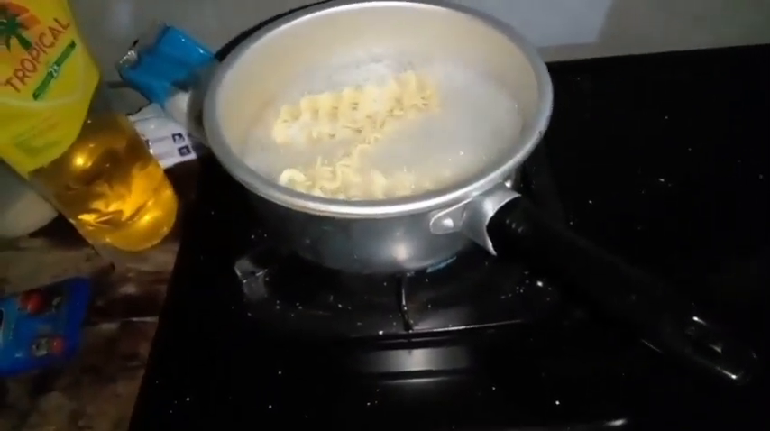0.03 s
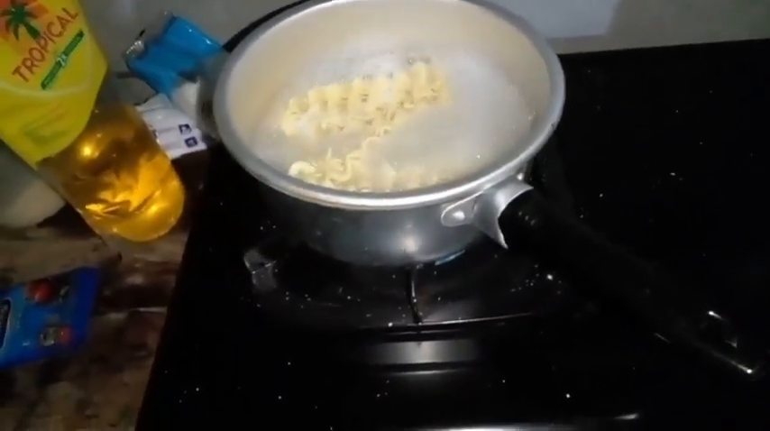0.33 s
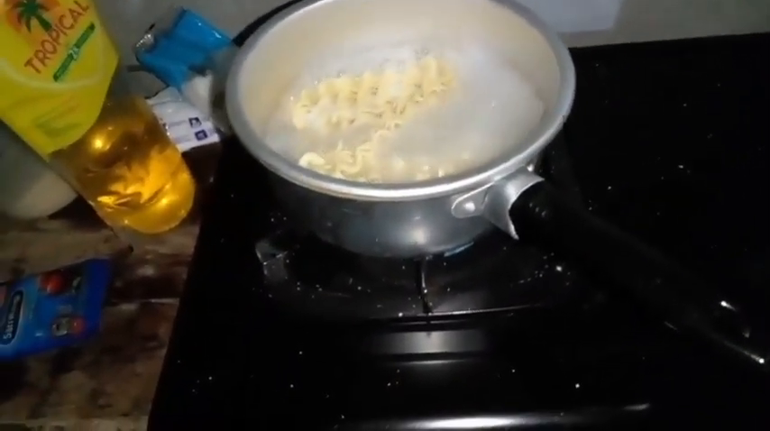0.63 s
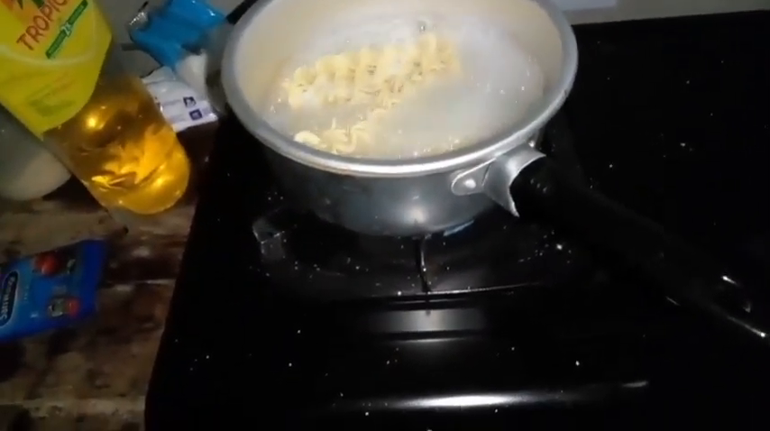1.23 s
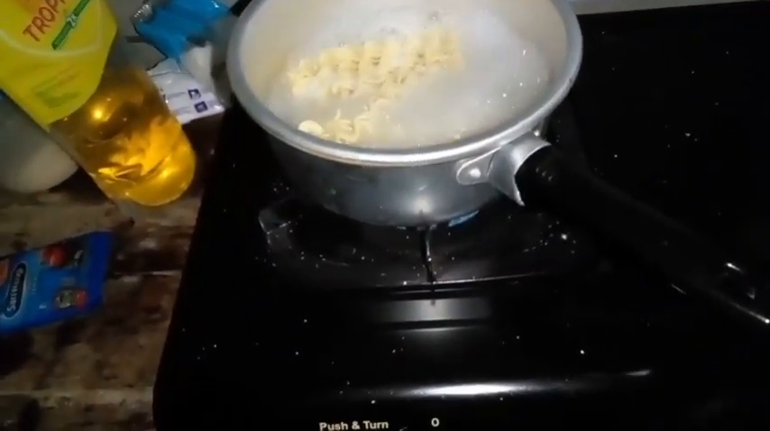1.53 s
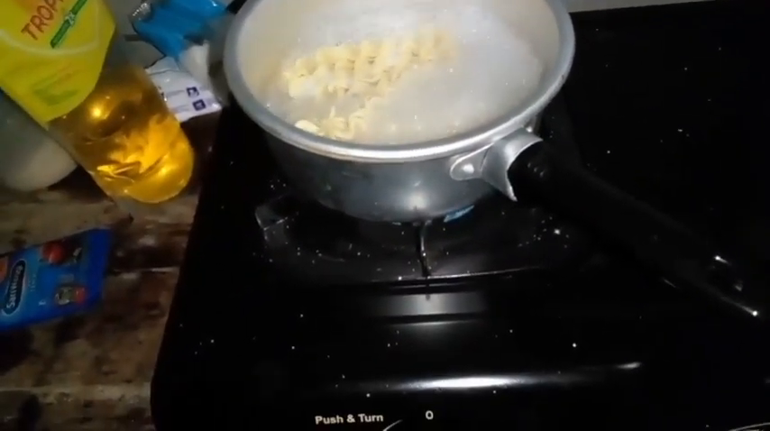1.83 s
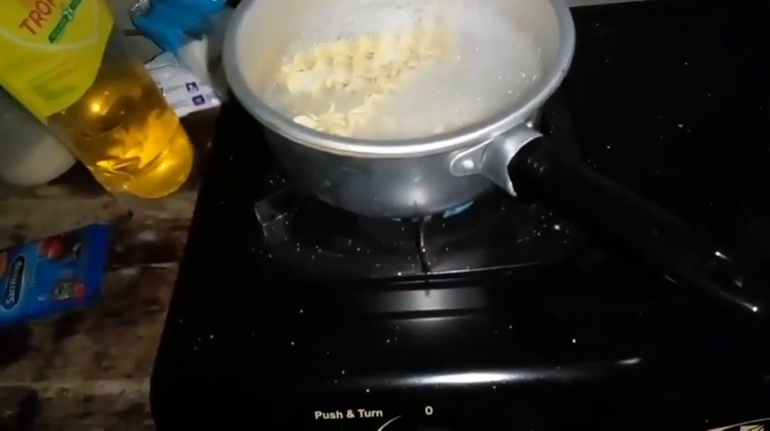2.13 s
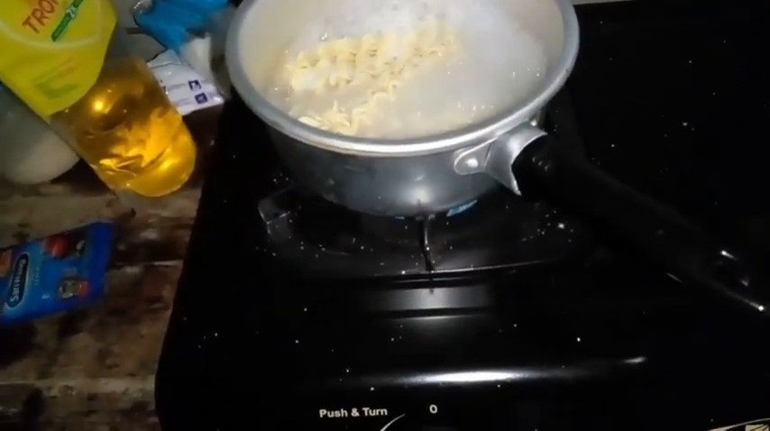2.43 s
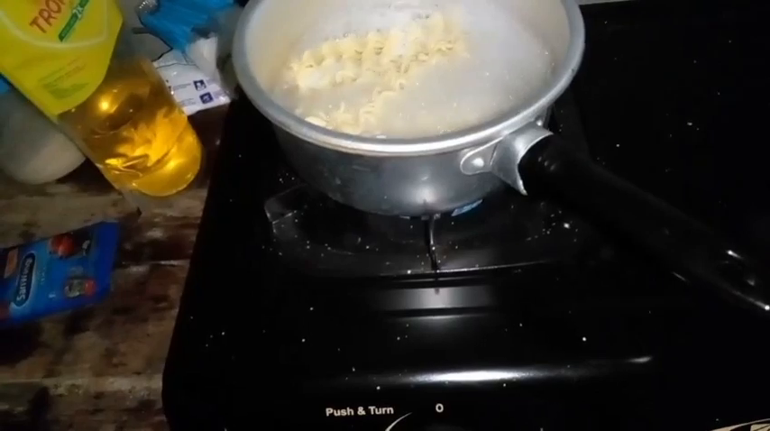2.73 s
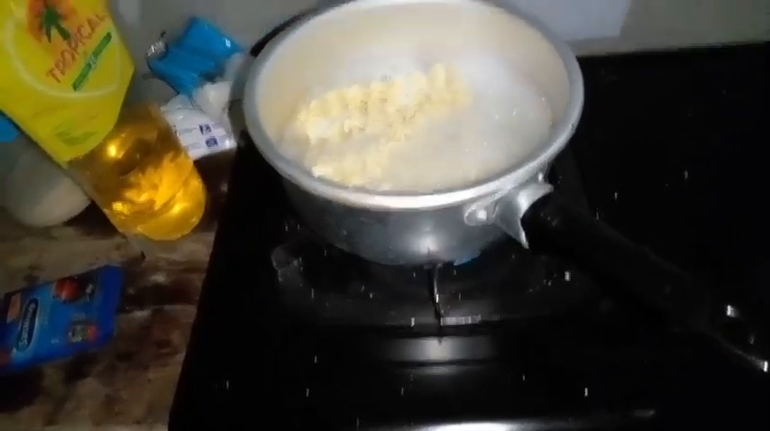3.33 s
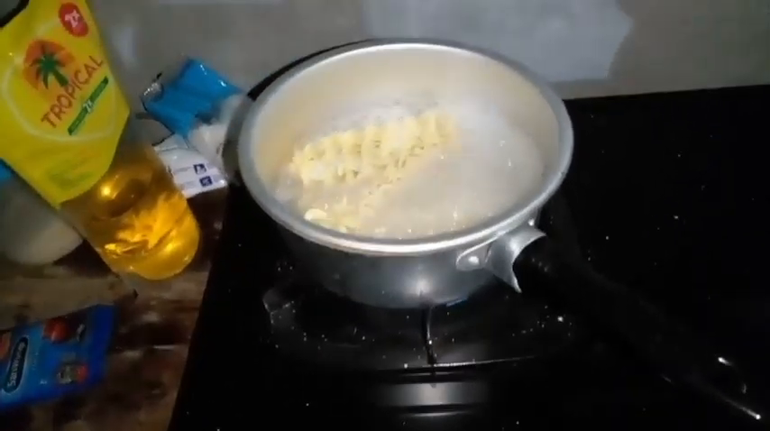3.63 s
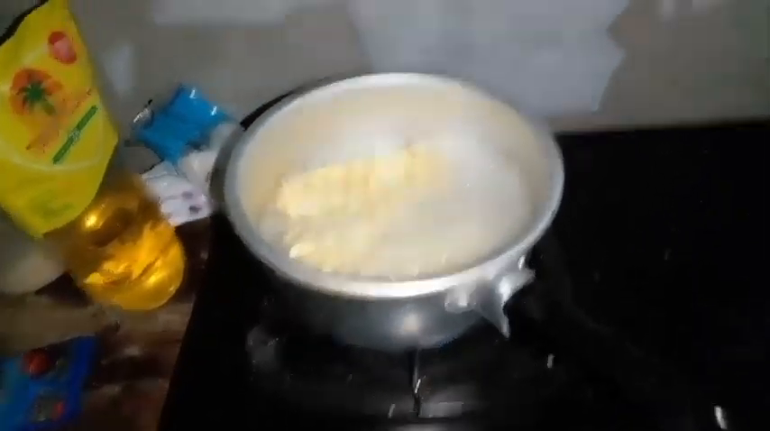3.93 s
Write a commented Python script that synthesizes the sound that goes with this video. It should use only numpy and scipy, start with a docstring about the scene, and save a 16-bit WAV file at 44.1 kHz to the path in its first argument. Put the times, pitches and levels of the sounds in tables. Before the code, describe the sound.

A plastic packet crinkles close by, with a first squeeze in the opening 0.3 seconds, then only sparse ticks until about 1.2. From there it crackles almost continuously to 4 seconds, with sharper snaps near 1.7, 2.0, 2.7, 3.2 and 3.7. A pot fizzes faintly over a softly rushing gas burner throughout, and faint low hums swell and fade until about 2.3. The small kitchen adds a short echo.

```python
"""A small kitchen: a plastic noodle packet is squeezed and crinkled beside a pot simmering on a stove.
The burner rushes under the fizzing pot, and a few low hums swell and fade.
Each squeeze buckles the film in a swarm of tiny creases; single folds snap out above them,
ringing the film and the packet's hollow, and the room answers. Mono."""
import sys
import numpy as np
from scipy import signal
from scipy.fft import rfft, irfft, next_fast_len
from scipy.io import wavfile
from scipy.ndimage import map_coordinates

SR = 44100
rng = np.random.default_rng(int(sys.argv[2]) if len(sys.argv) > 2 else 0)


def persist_wave(psi):
    """Save psi, clipped to +-1, as 16-bit WAV."""
    counts = np.round(np.clip(psi, -1, 1) * 32767).astype(np.int16)
    wavfile.write(sys.argv[1], SR, np.atleast_2d(counts).T)


N = 4 * SR
TIME_S = np.arange(N) / SR


def amp(db):
    """Decibels to gain."""
    return 10 ** (np.asarray(db) / 20)


def unit_rms(x):
    """Scale to rms 1."""
    return x / np.sqrt(np.mean(x ** 2) + 1e-20)


def over_frequency(points, hz):
    """Interpolate (frequency [Hz], value) points on a log axis."""
    knots_hz, values = np.transpose(points)
    return np.interp(np.log(hz + 1), np.log(knots_hz + 1), values)


def over_time(rows):
    """One value per sample for each column after the time."""
    knots_s, *columns = np.transpose(rows)
    return [np.interp(TIME_S, knots_s, column) for column in columns]


def wobble(rate_hz):
    """Smooth random curve, rate_hz knots a second."""
    knots = rng.standard_normal(int(N * rate_hz / SR) + 4)
    return map_coordinates(knots, [TIME_S * rate_hz])


def colour(x, spectrum):
    """Minimum-phase filter through (frequency [Hz], gain [dB]) points."""
    size = 2 * next_fast_len(len(x))
    gain = amp(over_frequency(spectrum, np.fft.rfftfreq(size, 1 / SR)))
    cepstrum = irfft(np.log(gain), size)
    cepstrum[1:size // 2] *= 2
    cepstrum[size // 2 + 1:] = 0
    return irfft(rfft(x, size) * np.exp(rfft(cepstrum)), size)[:len(x)]


def resonate(x, hz, q):
    """One resonance."""
    return signal.lfilter(*signal.iirpeak(hz, q, SR), x)


def swarm(rate_hz, spread_db, decay_s, count=16000):
    """Envelope of rms 1: tiny bursts of random time and size."""
    starts = (np.cumsum(rng.exponential(size=count)) * SR / rate_hz).astype(int)
    sizes = amp(spread_db * np.minimum(rng.standard_normal(count), 2))
    impulses = np.bincount(starts[starts < N], sizes[starts < N] ** 2, N)
    power = signal.lfilter([1], [1, -np.exp(-2 / (decay_s * SR))], impulses)
    return unit_rms(np.sqrt(power))


# flame spectrum (frequency [Hz], relative gain [dB])
BURNER_SPECTRUM = [(20, -46), (37, -10), (75, -2), (145, 2.5), (185, -5.5), (240, 2), (330, 0.5), (420, -8),
                   (520, -14.5), (800, -13.5), (1100, -21.5), (2000, -13.5), (6000, -42)]
# pot spectrum (frequency [Hz], relative gain [dB])
POT_SPECTRUM = [(500, -38), (1100, -9.5), (1350, -2), (1540, 9), (1700, -1.5), (2200, -6), (3000, -7.5),
                (4500, -11.5), (6800, -8.5), (7700, -19), (12500, -13), (16000, -17.5)]
# stove levels (time [s], burner [dB], simmer [dB])
STOVE_LEVELS = [(0, -47, -45), (.9, -48.5, -51), (1.08, -46.5, -46), (2, -46, -46.5), (2.6, -47, -47),
                (4, -46.5, -44.5)]


def stove():
    """The burner rushes; tiny bubbles fizz and ring the pot."""
    burner_db, simmer_db = over_time(STOVE_LEVELS)
    flame = unit_rms(colour(rng.standard_normal(N), BURNER_SPECTRUM))
    bubbles = swarm(rate_hz=1600, spread_db=3.5, decay_s=0.0023) * rng.standard_normal(N)
    pot = unit_rms(colour(bubbles, POT_SPECTRUM))
    return amp(burner_db) * flame + amp(simmer_db) * pot


# low hums (peak time [s], pitch [Hz], peak rms level [dB], 1/e half-width [s])
HUM_SWELLS = [(0.205, 77.1, -48.5, 0.18), (0.473, 76.2, -44.5, 0.07), (0.21, 211, -52, 0.12),
              (0.66, 209.2, -49, 0.2), (0.74, 96, -44, 0.14), (0.735, 137, -47, 0.24),
              (1.267, 139, -48, 0.17), (1.526, 79.3, -49.5, 0.16), (1.708, 73, -42.5, 0.059),
              (1.72, 210.4, -47, 0.076), (2.247, 134, -50.5, 0.075)]


def hums():
    """Low, slightly unsteady tones swell and fade."""
    out = np.zeros(N)
    for peak_s, hz, db, half_width_s in HUM_SWELLS:
        swell = amp(db) * np.exp(-((TIME_S - peak_s) / half_width_s) ** 2)
        drift_rad = 0.77 * wobble(rate_hz=12.8)
        out += swell * np.sqrt(2) * np.sin(2 * np.pi * hz * TIME_S + drift_rad)
    return out


# room decay (frequency [Hz], T60 [s])
KITCHEN_T60 = [(200, 0.84), (2000, 0.22), (6500, 0.23), (15000, 0.34)]


def kitchen(x, positions=14, wall_delay_s=0.0088):
    """Room reverberation, crossfaded from tail to tail as the packet moves."""
    out = np.zeros(N)
    position = np.linspace(0, positions - 1, N)
    for k in range(positions):
        hz, t, noise = signal.stft(rng.standard_normal(SR // 2), SR, nperseg=256)
        decay = amp(-60 * t / over_frequency(KITCHEN_T60, hz)[:, None])
        _, tail = signal.istft(noise * decay, SR, nperseg=256)
        tail *= 1 - np.exp(-(np.arange(len(tail)) / SR / wall_delay_s) ** 2)
        crossfade = np.maximum(1 - abs(position - k), 0)
        out += signal.fftconvolve(x * crossfade, tail / np.linalg.norm(tail))[:N]
    return out


# film spectrum (frequency [Hz], relative gain [dB])
FILM_SPECTRUM = [(300, -23.5), (800, -6), (1100, -11.5), (1700, -3.5), (2200, 1), (2850, -3), (3300, -3),
                 (4100, -4), (5300, -5), (6900, -1), (7700, -18.5), (9000, -25)]
# film's top treble (frequency [Hz], relative gain [dB])
CRACK_SPECTRUM = [(1000, -39), (5000, -22), (7500, -3), (9000, -1), (12000, 4), (14000, 2.5), (16000, 0)]
# steady handling between squeezes (time [s], relative level [dB])
HANDLING_LEVELS = [(0, -54.5), (.3, -47), (.45, -56), (.9, -68), (1.02, -56), (1.2, -46.5), (1.55, -45.5),
                   (1.85, -42), (2.16, -47.5), (2.33, -42), (2.4, -59.5), (2.63, -50), (2.71, -46),
                   (2.95, -46.5), (3.17, -47.5), (3.5, -43), (3.82, -42), (4, -45)]
# squeezes (peak time [s], relative level [dB], rise [s], fall [s], treble boost [dB], hollow pitch [Hz])
PACKET_SQUEEZES = [(.135, -41.5, 0.033, 0.15, 0, 2050), (.2, -36.5, 0.064, 0.054, 3, 2200),
                   (0.948, -36.5, 0.011, 0.012, 0.5, 1780), (1.31, -41.5, 0.17, .025, -1, 2530),
                   (1.615, -34, 0.041, 0.071, 1.5, 2450), (1.705, -29.5, 0.022, 0.026, 6, 2230),
                   (1.95, -37, 0.065, 0.088, 6, 2400), (2.032, -36, 0.042, 0.028, -2, 2390),
                   (2.428, -30, 0.009, 0.014, 5, 2610), (2.52, -36, 0.03, 0.035, -1, 2600),
                   (2.748, -38, 0.047, 0.014, 4, 2610), (2.9, -40.5, 0.039, 0.08, 2, 2700),
                   (3.056, -29, 0.012, 0.028, 5.5, 2860), (3.259, -33, 0.035, 0.061, 4.5, 2490),
                   (3.46, -37.5, 0.029, 0.12, -1, 2140), (3.653, -31, 0.029, 0.019, 3.5, 2260),
                   (3.69, -37, 0.06, 0.064, 1, 1760), (3.899, -34.5, 0.033, 0.027, 7, 2520)]
HOLLOW_Q = 6.7


def crinkle(shared=0.39, hollow_db=-7, film_db=-1.5, top_db=-9):
    """Swarms of creases swell with each squeeze and ring the packet's hollow, over steady handling."""
    common, *own = [swarm(rate_hz=1400, spread_db=8, decay_s=0.00079) for _ in range(4)]
    crease_power = shared * common ** 2 + (1 - shared) * np.square(own)  # partly common to all bands
    low, middle, high = np.sqrt(crease_power) * rng.standard_normal((3, N))
    hollow_drive = colour(low, FILM_SPECTRUM)
    hollow = np.zeros(N)
    film_power = top_power = amp(over_time(HANDLING_LEVELS)[0]) ** 2
    for peak_s, db, rise_s, fall_s, treble_db, hollow_hz in PACKET_SQUEEZES:
        t = TIME_S - peak_s
        push = amp(db) * np.exp(-np.where(t < 0, (t / rise_s) ** 2, t / fall_s))
        film_power = film_power + push ** 2
        top_power = top_power + (push * amp(treble_db)) ** 2
        hollow += push * unit_rms(resonate(hollow_drive, hollow_hz, HOLLOW_Q))
    film = np.sqrt(film_power) * unit_rms(colour(middle, FILM_SPECTRUM))
    top = np.sqrt(top_power) * unit_rms(colour(high, CRACK_SPECTRUM))
    return amp(hollow_db) * hollow + amp(film_db) * film + amp(top_db) * top


# film's two resonances (frequency [Hz], Q)
FILM_MODES = [(3350, 5.5), (5650, 3.9)]
LEAD_IN_S, LEAD_IN_DB = 0.007, -17  # crackle before a fold flips


def fold(time_s, low_db, high_db, crack_db, ring_s, crack_s, spread_oct=0.071):
    """A fold flips: a burst rings the hollow, as shaped just then, and the film, with a crack on top."""
    t = np.arange(SR // 28) / SR - LEAD_IN_S
    attack = (t >= 0) & (t < 0.004)
    band = np.vstack([signal.butter(2, 1720, 'high', fs=SR, output='sos'),
                      signal.butter(9, 7240, 'low', fs=SR, output='sos')])

    def burst(decay_s):
        envelope = np.where(t < 0, amp(LEAD_IN_DB) * (1 + t / LEAD_IN_S), np.exp(-t / decay_s))
        return envelope * np.sign(rng.standard_normal(len(t)))

    crack = colour(burst(crack_s), CRACK_SPECTRUM)
    out = amp(crack_db) * crack / crack[attack].std()
    squeeze_s, *_, hollow_hz = np.transpose(PACKET_SQUEEZES)
    modes = [(np.interp(time_s, squeeze_s, hollow_hz), HOLLOW_Q), *FILM_MODES]
    for db, (hz, q) in zip([low_db, low_db - 2, high_db], modes):
        pitch_hz = hz * 2 ** (spread_oct * rng.standard_normal())
        ring = signal.sosfilt(band, resonate(burst(ring_s), pitch_hz, q))
        out += amp(db) * ring / ring[attack].std()
    return out


def ticks(rate_hz=55, spread_db=5.5, tilt_db=2.5, count=300):
    """Small folds tick at random, each with its own colour; their level follows the handling."""
    out = np.zeros(N + SR)
    times_s = np.cumsum(rng.gamma(2, 0.5, count)) / rate_hz
    variations = np.clip(rng.standard_normal((count, 2)), -1.4, 1.4)
    for time_s, (size, tilt) in zip(times_s, variations):
        db = spread_db * size - 0.5
        tick = fold(time_s, low_db=db - tilt_db * tilt, high_db=db + tilt_db * tilt,
                    crack_db=db - 1.5, ring_s=0.0012, crack_s=0.0012)
        out[min(round(time_s * SR), N):][:len(tick)] += tick
    return out[:N] * amp(over_time(HANDLING_LEVELS)[0])


# big folds, relative levels (time [s], low ring [dB], high ring [dB], crack [dB])
FOLD_SNAPS = [(0.086, -33, -44, -45), (0.0952, -39, -33, -35), (0.129, -27.5, -44, -48),
              (0.2423, -33, -42, -42), (0.2604, -33, -49, -43), (0.2814, -34.5, -45, -51),
              (0.2972, -39, -33, -31.5), (0.521, -40.5, -38, -44), (0.5907, -41.5, -43, -45),
              (0.7292, -51, -38, -50), (0.807, -43, -45.5, -60), (0.9457, -41, -49, -54),
              (0.9646, -39.5, -36, -38), (1.042, -32.5, -32, -39), (1.096, -36, -41, -48),
              (1.2551, -29.5, -43, -35.5), (1.2623, -36.5, -45, -41), (1.277, -34.5, -55, -55),
              (1.3249, -25.5, -45, -36.5), (1.364, -40, -37, -32.5), (1.3748, -40, -35.5, -38),
              (1.4147, -41, -43, -39), (1.4869, -31.5, -32.5, -32), (1.529, -33.5, -38, -35.5),
              (1.594, -31, -34, -29.5), (1.6198, -25, -36, -38), (1.6759, -24.5, -29, -49),
              (1.689, -25, -23.5, -39), (1.693, -23.5, -27, -34), (1.7017, -41, -21, -32),
              (1.7953, -35.5, -46, -34), (1.866, -30, -32, -42), (1.935, -25.5, -28, -32),
              (1.9716, -27.5, -27, -34), (2.003, -27, -41, -32), (2.015, -31, -24.5, -41),
              (2.0346, -33, -34, -43), (2.0431, -23.5, -27, -34), (2.127, -31, -37, -42),
              (2.146, -31.5, -38, -52), (2.157, -35, -33, -43), (2.1667, -29, -40, -36),
              (2.1868, -32.5, -52, -50), (2.2093, -33.5, -49, -44), (2.2546, -33.5, -35, -38),
              (2.3207, -34.5, -45, -45), (2.35, -37, -30.5, -35), (2.387, -37.5, -39, -42),
              (2.4187, -36, -28.5, -32), (2.4284, -32, -31, -34), (2.4654, -51, -29, -33),
              (2.517, -29, -43, -29.5), (2.5202, -29, -28.5, -31.5), (2.6723, -33.5, -39, -40),
              (2.7083, -32, -30, -40), (2.7162, -32, -39, -29.5), (2.7233, -38, -24.5, -42),
              (2.734, -27, -26, -37), (2.7476, -53, -25, -42), (2.7554, -27, -35, -28.5),
              (2.7595, -28, -28.5, -31), (2.888, -29, -36, -35), (2.939, -37, -36, -38),
              (2.967, -35.5, -34, -34), (3.028, -43, -48, -41), (3.038, -30, -34, -33.5),
              (3.054, -31.5, -30.5, -34), (3.091, -36, -38, -47), (3.227, -30, -21.5, -31),
              (3.243, -38, -37, -42), (3.256, -35, -27, -42), (3.277, -23.5, -30, -31),
              (3.4151, -34, -33, -46), (3.4307, -20, -31, -41), (3.467, -27, -29.5, -39),
              (3.519, -40, -35, -38), (3.529, -32.5, -45, -45), (3.574, -47, -39, -44),
              (3.6114, -32.5, -33, -38), (3.6605, -48, -31, -41), (3.6705, -31, -21.5, -25.5),
              (3.773, -42, -28.5, -46), (3.8488, -51, -30.5, -35), (3.8996, -43, -29.5, -36)]


def snaps(ring_gain_db=-3, crack_gain_db=-1):
    """Big folds snap through, one by one."""
    out = np.zeros(N + SR)
    for time_s, low_db, high_db, crack_db in FOLD_SNAPS:
        snap = fold(time_s, low_db + ring_gain_db, high_db + ring_gain_db, crack_db + crack_gain_db,
                    ring_s=0.0019, crack_s=0.0026)
        out[round((time_s - LEAD_IN_S) * SR):][:len(snap)] += snap
    return out[:N]


def scene(room_db=-5.5):
    """Packet, room, stove and hums, the same in both channels."""
    packet = snaps() + crinkle() + ticks()
    mono = packet + amp(room_db) * kitchen(packet) + stove() + hums()
    return np.array([mono, mono])


def record(dry):
    """Steep low-pass at the band limit."""
    cutoff_hz, edge_hz = 15850, 200
    size = next_fast_len(N + SR // 2)
    passband = np.clip((cutoff_hz - np.fft.rfftfreq(size, 1 / SR)) / edge_hz + 0.5, 0, 1)
    return irfft(rfft(dry, size) * passband, size)[:, :N]


dry = scene()
out = record(dry)
persist_wave(out)
```